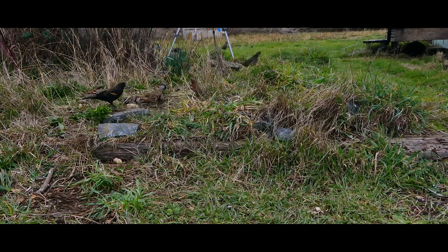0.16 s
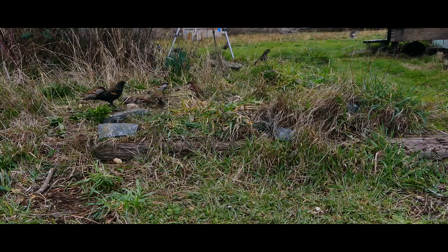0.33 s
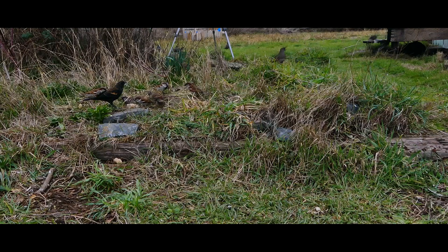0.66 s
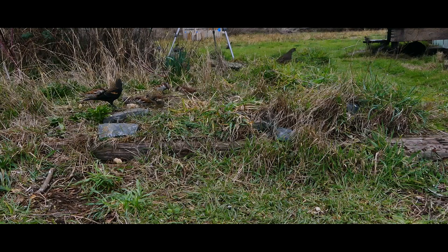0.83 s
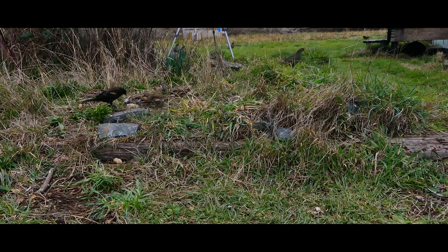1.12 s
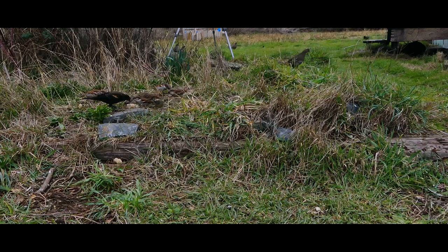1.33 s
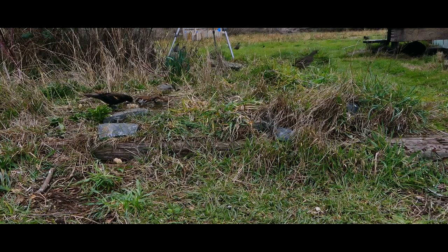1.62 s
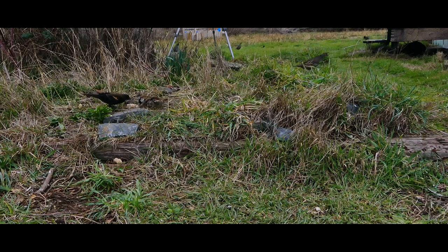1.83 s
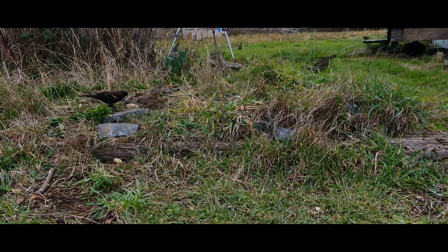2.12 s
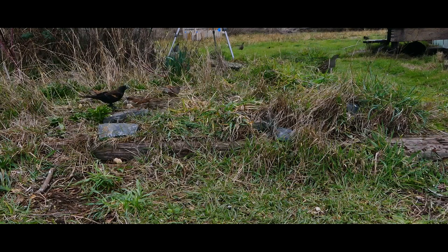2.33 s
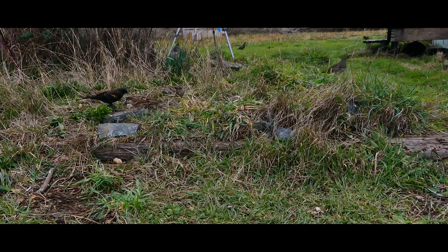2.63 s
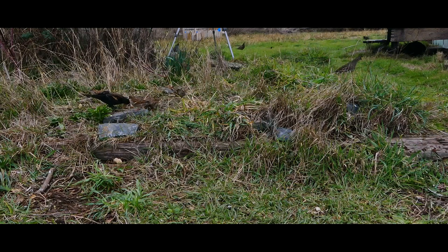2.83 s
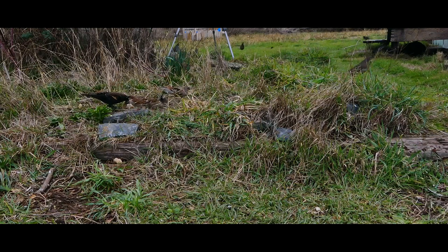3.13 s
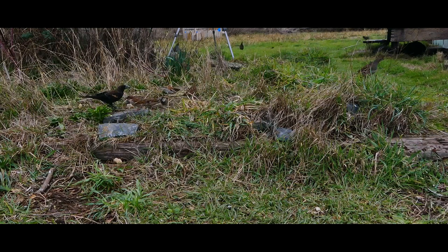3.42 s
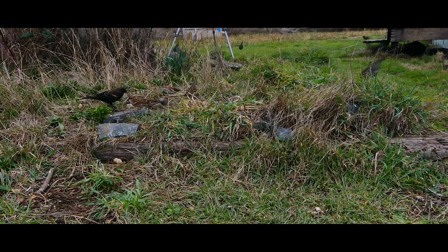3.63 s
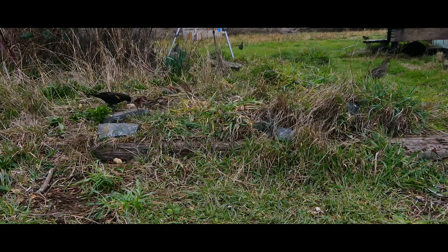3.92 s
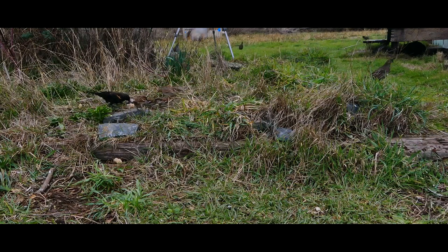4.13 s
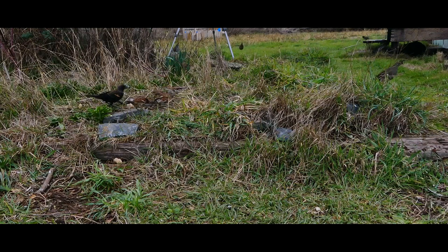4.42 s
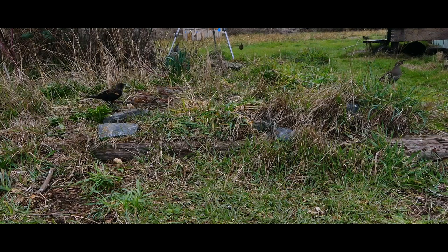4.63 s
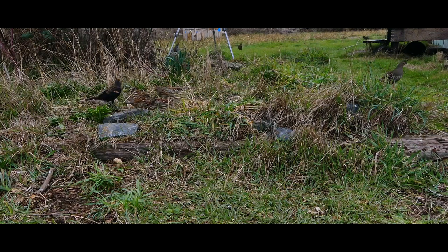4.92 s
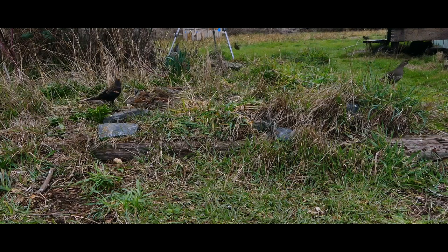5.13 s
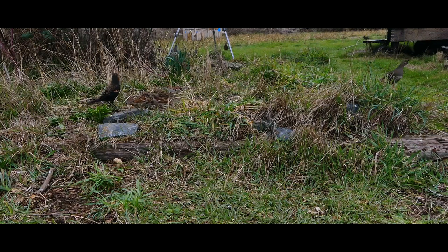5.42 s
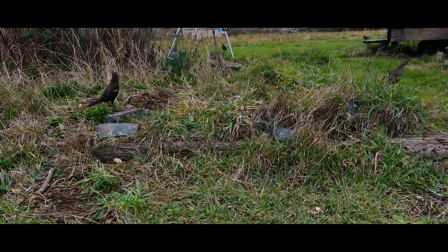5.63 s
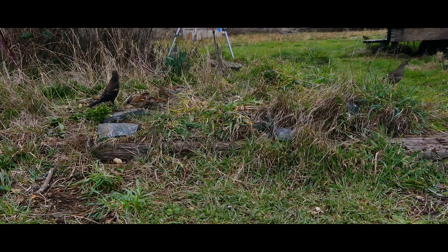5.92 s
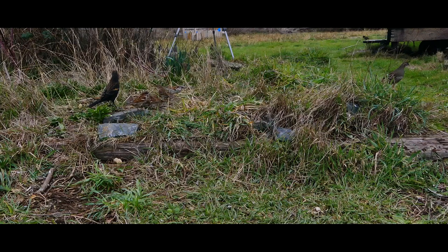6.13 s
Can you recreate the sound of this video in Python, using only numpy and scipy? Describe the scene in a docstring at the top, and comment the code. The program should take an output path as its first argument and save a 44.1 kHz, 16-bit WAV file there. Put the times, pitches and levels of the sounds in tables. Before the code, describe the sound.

A quiet grassy yard outdoors, with a soft low traffic hum far off and a faint treble hiss. From 0 to 1.2 seconds a small bird gives eight sharp, high chips about 0.16 seconds apart, each a tiny upward whip, the first strongest and sweeping highest; soft low clucks alternate with them. Crisp dry stem ticks dot the run, clearest near 0.35. A lone bright chip comes at 2.06, a tick at 2.4, a nearly hidden coo around 2.7 and a thin falling far whistle at 3.1. Wind bumps the microphone lightly, harder near 4.1. A strong chip at 4.2 has two weaker followers. From 5.0 to 6.3 chips crowd together unevenly, with clucks from 5.6, thin rasps and faint pulsed noise, while low wind thumps grow heaviest. Calls leave short, grainy echoes.

```python
"""Small birds in a grassy yard give sharp rising chip calls, singly and in trains: swept tones with an octave overtone.
A ground bird clucks softly between them in short harmonic notes; far birds whistle and coo in gliding tones.
Beaks and feet tick in dry stems as brief noise snaps; a faint treble haze swells, and pulsed noise fills late gaps.
Wind thumps the microphone over a distant low hum of traffic, both noise in low bands.
Fences and walls scatter the calls and ticks into a short grainy tail."""
import sys
import numpy as np
from scipy import signal
from scipy.fft import rfft, irfft, next_fast_len
from scipy.io import wavfile
from scipy.ndimage import uniform_filter1d, map_coordinates

SR = 44100
rng = np.random.default_rng(int(sys.argv[2]) if len(sys.argv) > 2 else 0)


def to_wav(s):
    """Save 16-bit WAV."""
    ch = np.atleast_2d(s).T  # columns
    pcm = np.round(np.clip(ch, -1, 1) * 32767)  # PCM
    wavfile.write(sys.argv[1], SR, pcm.astype(np.int16))


N = 276507

# Chip calls; start, length and pitches are of the loud part, the last three levels are relative:
# start_s, level_db, length_ms, first_hz, last_hz, octave_overtone_db, swing_in_db, run_out_db
CHIP_CALLS = [(0.0385, -20.5, 9.6, 5976, 10500, -25, -34, -17),
              (0.1884, -26.5, 3.7, 5240, 7680, -30.5, -30, -6.5),
              (0.3376, -29, 6, 5150, 7260, -31, -38.5, -7.5),
              (0.4974, -26, 2.1, 5280, 7690, -27.5, -39, -10.5),
              (0.6584, -28, 4.4, 5400, 7580, -30.5, -16, -6.5), (0.8146, -27, 4.5, 5150, 7390, -30, -8, -3),
              (0.9745, -25.5, 1.85, 5210, 7100, -37, -23, -3.5),
              (1.1458, -28, 2.4, 5310, 7360, -35, -19, -13),
              (2.0585, -21.5, 8.6, 5580, 10400, -29.5, -37.5, -25.5),
              (4.2097, -20, 7.2, 5800.0, 10090, -32.5, -39, -24),
              (4.3872, -28, 4.7, 5970, 6940, -25, -30, -42),
              (4.5645, -34, 5.6, 5730, 6430, -33, -28.5, -37),
              (4.9847, -35, 3.1, 6100, 6200, -38, -16.5, -35.5),
              (5.1367, -21.5, 3.6, 5920, 6770, -18, -9.5, -14), (5.2797, -29, 3, 6050, 7000, -25, 4, -30),
              (5.4262, -30.5, 3.6, 6010, 6760, -29, 4, -18), (5.464, -25, 4.6, 6300, 9000, -46, -31, -14),
              (5.536, -49, 2.2, 4900, 7240, -36, -3.5, -14),
              (5.5997, -24.5, 3.1, 5736, 7850, -37, -4.5, -13),
              (5.6412, -21, 1.7, 5340, 8290, -36, -35.5, -12.5),
              (5.7742, -24, 3.6, 5990, 6650, -25, -9.5, -24),
              (5.7872, -24, 4.3, 4950, 8270, -39.5, -19, -8), (5.7992, -33, 5.4, 5540, 7100, -25, -2, -15),
              (5.9333, -30, 4.6, 5280, 7900, -32, -14, -5), (5.9739, -34.5, 2.3, 4920, 6650, -37, -22, -13),
              (6.0737, -28.5, 3.4, 5450, 7310, -33, -8, -2), (6.1154, -37, 3.7, 5410, 6130, -38, -37, -24),
              (6.2662, -31.5, 7.2, 5000.0, 7170, -29, -28, -14)]
# Throat clucks, nominal values: start_s, level_db, pitch_hz, length_ms
THROAT_CLUCKS = [(0.146, -43.5, 697, 15), (0.304, -41, 703, 15.5), (0.461, -41.5, 676, 15),
                 (0.627, -42.5, 668, 15), (0.782, -42.5, 660, 23), (0.936, -46.5, 645, 19.6),
                 (1.11, -47.5, 671, 23.4), (1.321, -50, 726, 11.6), (5.605, -40, 690, 16),
                 (5.752, -41.5, 681.6, 19.6), (5.898, -39, 655, 20), (6.04, -38.5, 644, 20),
                 (6.216, -42.5, 659, 19)]
# Thin rasps with a weak fundamental: start_s, level_db, nominal pitch_hz, length_ms, overtone_centre_hz
THIN_RASPS = [(1.322, -54.5, 856, 11.5, 4850), (5.104, -62, 770, 13.7, 5570),
              (5.243, -49.5, 782, 13.5, 4200), (5.392, -65, 810, 13.7, 5300), (5.426, -51, 710, 7.2, 3460),
              (5.57, -65, 752, 14, 4030), (5.88, -64.5, 755, 20, 3600), (5.95, -61.5, 810, 15.2, 3600)]
# Far whistles, nominal values: start_s, level_db, length_ms, first_hz, middle_hz, last_hz
FAR_WHISTLES = [(1.245, -68, 27, 4670, 4250, 4000), (1.287, -68, 23.6, 3260, 3050, 3000),
                (2.958, -74, 48, 2437, 5380, 4560), (2.962, -78, 48, 5400, 7100, 5750),
                (3.075, -62.5, 29, 6100, 6270, 6070), (3.075, -60.5, 22, 5880, 5700, 5670),
                (3.121, -51, 52, 5030, 3720, 3470), (6.101, -54, 14.4, 1986, 4170, 5600),
                (6.253, -49, 11.7, 2240, 4600, 5970)]
# Faint low cooing far off, nominal values: start_s, level_db, length_ms, pitch_hz
FAR_COOS = [(2.66, -65, 280, 496), (4.72, -61.5, 220, 481)]
# Ticks in dry stems: start_s, peak_db, centre_hz, spread_octaves
STEM_TICKS = [(0.015, -36.5, 9350, 0.7), (0.3477, -27, 10100, 0.66), (0.4364, -49, 9900, 0.52),
              (0.4768, -42, 9500, 0.7), (0.535, -44, 10100, 0.28), (0.5896, -52, 14100, 0.4),
              (0.635, -45, 9500, 0.69), (1.1296, -43.5, 9200, 0.67), (1.279, -55, 10000, 0.18),
              (1.308, -52, 10000, 0.21), (1.457, -56.5, 12600, 0.34), (1.7444, -49, 14000, 0.31),
              (2.0354, -42, 9700, 0.54), (2.4396, -33.5, 11660, 0.61), (2.4741, -58.5, 10920, 0.49),
              (2.6708, -63, 10960, 0.37), (2.8999, -43.5, 12000, 0.45), (2.908, -35, 14000, 0.55),
              (3.319, -53.5, 14000, 0.4), (3.906, -62, 10870, 0.4), (4.022, -53, 12200, 0.4),
              (4.0363, -60, 9400, 0.32), (5.2006, -64, 10300, 0.45)]
# Level of the faint pulsed noise between the late calls: time_s, level_db
PULSED_LEVEL = [(5.05, -100), (5.2, -72), (5.45, -69), (5.7, -80), (5.9, -70), (6.0, -74), (6.15, -78),
                (6.27, -72)]
# Relative spectral density of the pulsed noise: frequency_hz, density_db_per_hz
PULSED_SPECTRUM = [(1200, -120), (1800, -12), (2800, -2), (3700, 0), (5000, -4), (8000, -14), (14000, -30)]
# Swells of the treble haze, broad among the calls, brief elsewhere:
# peak_s, rise_over_rest_db, dying_time_s (to 1/e of the dB rise)
HAZE_SWELLS = [(0, 5, .9), (.36, 9, .07), (.56, 5, .07), (2.459, 7, .06), (2.66, 4, .06), (3.9, 3.5, .05),
               (4.04, 13, .08), (5.15, 3.5, .8)]
# Relative spectral density of the treble haze: frequency_hz, density_db_per_hz
HAZE_SPECTRUM = [(1760, -35.5), (3000, 3.5), (3180, -17), (3710, -12.5), (4690, -11), (5040, -6),
                 (5720, -1), (7710, -9), (9470, -1.5), (12400, -3), (15100, -4.5), (15800, -15.5),
                 (16400, -24.5)]
# Strength of the wind on the microphone: time_s, strength_db
WIND_STRENGTH = [(0, -70), (1.5, -64), (1.9, -55), (2.4, -51), (2.8, -62), (3.6, -55), (4.05, -48),
                 (4.3, -52), (4.7, -57), (5.1, -50), (5.45, -46), (5.68, -48), (5.8, -44), (5.93, -49),
                 (6.1, -42), (6.27, -41.5)]
# Relative spectral density of wind thumps, also used for the drone: frequency_hz, density_db_per_hz
THUMP_SPECTRUM = [(29, -67), (50, -34.5), (75, -8), (107, 2.5), (124, 1), (145, -5.5), (198, -7.5),
                  (350, -21.5), (460, -43), (770, -120)]
# Relative spectral density of the deep wind buffet: frequency_hz, density_db_per_hz
BUFFET_SPECTRUM = [(15, -29.5), (30, -17), (50, -6.5), (70, 0), (95, -16.5), (130, -41), (200, -120)]
# The hardest wind lumps: centre_s, peak_db, length_ms, pitch_hz
WIND_LUMPS = [(1.718, -45.5, 39, 113), (1.823, -39, 39, 92), (2.165, -38, 15, 113), (2.435, -44.5, 34, 100),
              (2.651, -46.5, 34, 118), (3.382, -45, 21, 108), (3.906, -41.5, 15, 97),
              (3.969, -40.5, 47, 124), (4.087, -34, 22, 108), (4.212, -41.5, 35, 124),
              (4.398, -47.5, 21, 108), (5.218, -34, 24, 102), (5.298, -34.5, 33, 97),
              (5.385, -32.5, 19, 118), (5.478, -39, 12, 102), (5.606, -34.5, 23, 170),
              (5.782, -33, 32, 108), (5.85, -35.5, 14, 113), (6.02, -37, 48, 105), (6.091, -30.5, 23, 129),
              (6.169, -30, 24, 102), (6.215, -32.5, 17, 110)]
# Level of the far traffic hum: time_s, level_db
TRAFFIC_LEVEL = [(0, -53.5), (1.4, -54.5), (2.2, -56), (3.0, -56.5), (4.1, -55), (4.5, -56.5), (5.3, -55),
                 (6.27, -52.5)]
# Relative spectral density of the traffic hum: frequency_hz, density_db_per_hz
HUM_SPECTRUM = [(100, -31), (170, -1), (203, -2.5), (371, -6.5), (414, -7.5), (462, -5.5), (617, -9),
                (768, -11), (1400, -13.5), (2150, -26), (2860, -44), (4500, -43), (5850, -76.5),
                (9900, -120)]
# Level of the low drone of the traffic: time_s, level_db
DRONE_LEVEL = [(0, -54), (1.6, -53.5), (3, -60), (6.27, -62)]
# Reverberation of the yard, time to fall 60 dB: frequency_hz, t60_s
YARD_DECAY = [(600, 0.25), (3000, 0.29), (4500, 0.18), (6500, 0.16), (10000, 0.15), (15000, 0.14)]
# Frequency response of the microphone: frequency_hz, gain_db
MIC_RESPONSE = [(2500, -2), (4300, -5.5), (6300, 3), (8000, -2), (10000, 2.5), (12500, -3.5), (15500, 0.5),
                (16400, -11.5)]

TOP_HZ = 16400  # band limit
# Overtone slope per octave at the middling level; fuller clucks are rounder by DULLS dB per dB
CLUCK_SLOPE_DB, CLUCK_MID_DB, CLUCK_DULLS = -7.5, -42, .7
RASP_OCTAVES = .65  # spread of the overtones heard
PULSES_PER_S = 22  # mean rate of the pulsed noise
HAZE_DB, SWELL_RISE_S = -85.5, 0.033  # haze at rest; time constant of a swell coming up
# Deep buffet level at a middling wind; it swings wider than the wind
BUFFET_DB, BUFFET_GROWS, BUFFET_FROM_DB = -64.5, 1.1, -54


def amp(db):
    """A level in decibels is twenty times the logarithm of the gain."""
    return 10 ** (np.asarray(db) / 20)


def unit(x):
    """Division by the root mean square gives a signal of rms 1."""
    return x / np.sqrt(np.mean(x ** 2) + 1e-20)


def along(points, hz):
    """A spectrum given as (Hz, value) points is interpolated on a logarithmic frequency axis."""
    f, v = np.transpose(points)
    return np.interp(np.log(hz + 1), np.log(f + 1), v)


def curves(rows):
    """Linear interpolation in time gives one value per sample for each column after the time."""
    s, *cols = np.transpose(rows)
    return [np.interp(np.arange(N) / SR, s, c) for c in cols]


def span(ms):
    """Progress through a note runs uniformly from 0 to 1."""
    return np.linspace(0, 1, max(round(ms * SR / 1000), 8))


def filtered(x, response):
    """A linear filter multiplies the spectrum by its frequency response."""
    m = next_fast_len(len(x) + 8192)
    hz = np.fft.rfftfreq(m, 1 / SR)
    return irfft(rfft(x, m) * response(hz), m)[:len(x)]


def wobble(rate):
    """A slow random fluctuation is a smooth curve through rate random knots a second."""
    knots = rng.standard_normal(int(N * rate / SR) + 4)
    return map_coordinates(knots, [np.arange(N) * rate / SR])


def rush(spectrum, patchy_db):
    """Coloured noise of rms 1 is shaped by a spectrum, its gain varying in patches of time and frequency."""
    z = signal.stft(rng.standard_normal(N + 512), nperseg=512)[2]
    field = uniform_filter1d(rng.standard_normal(z.shape), size=6, axis=0)
    field = uniform_filter1d(field, size=10, axis=1)
    noise = signal.istft(z * amp(patchy_db * unit(field)), nperseg=512)[1][:N]
    return unit(filtered(noise, lambda hz: amp(along(spectrum, hz))))


def add(out, s, sound, wet_db, lumpy_db=3.5):
    """Scattering adds clumped echoes to a sound, each frequency decaying exponentially at its own rate."""
    hz, t, z = signal.stft(rng.standard_normal(SR // 2), SR, nperseg=128)
    clumps = lumpy_db * rng.standard_normal(len(t))
    near_fences = amp(-60 * t / along(YARD_DECAY, hz)[:, None])
    far_walls = amp(-31 - 60 * t / 0.53)
    tail = signal.istft(z * (near_fences + far_walls) * amp(clumps), SR, nperseg=128)[1]
    delayed = np.pad(tail / np.linalg.norm(tail), (round(0.0037 * SR), 0))
    heard = amp(wet_db) * signal.fftconvolve(sound, delayed)
    heard[:len(sound)] += sound
    spot = out[round(s * SR):][:len(heard)]
    spot += heard[:len(spot)]


def chips():
    """Frequency modulation snaps a whistle upward: a swing-in rich in overtone, from faint to as strong
    as the sweep, then the loud sweep and a weaker run-out above."""
    out, lead_ms, trail_ms = np.zeros(N), 3., 2.2
    for s, db, ms, first, last, over_db, lead_db, trail_db in CHIP_CALLS:
        u, v, w = span(ms), span(lead_ms), span(trail_ms)
        swing_in = first * (.58 + .42 * v ** .8)
        sweep = first + (last - first) * u ** 0.71
        pitch = np.concatenate([swing_in, sweep, last + 1800 * w])

        width = (last - first) / 4500
        skew = .95 - .45 * width  # wide sweeps are loudest early, and they throb
        throb = 1 + .45 * width ** 2 * np.sin(2 * np.pi * (550 * u * ms / 1000 + rng.random()))
        edges = amp(lead_db) * (1 - u) + amp(trail_db) * u
        loud = edges + throb * np.sin(np.pi * u ** skew)
        level = np.concatenate([amp(lead_db) * v ** 1.04, loud, amp(trail_db) * (1 - w)])
        level = signal.fftconvolve(level, np.hanning(40) / 20, "same")  # rounds the joins

        below_first = np.clip(1 - pitch / first, 0, 1)
        overtone = amp(over_db + 26 * below_first / 0.39)
        phase = 2 * np.pi * np.cumsum(pitch) / SR
        call = amp(db) * level * (np.sin(phase) + overtone * np.sin(2 * phase))
        # the bounce off the ground splits the note into lobes
        lag = round((1.5 + .9 * rng.random()) * SR / 1000)
        call = np.pad(call, (0, lag)) + amp(-6) * np.pad(call, (lag, 0))
        add(out, s - lead_ms / 1000, call, wet_db=-6)
    return out


def stack(hz, ms, gains, rough_db, loose):
    """A rising harmonic series: high overtones sound only near its peak, each flickers, loose frees phases."""
    u, k = span(ms), np.arange(1, 13)[:, None]  # k: harmonic number
    phase = 2 * np.pi * np.cumsum(hz * (.84 + 0.205 * u ** .5)) / SR
    flicker = uniform_filter1d(rng.standard_normal((len(k), len(u))), size=60, axis=1)
    flicker = uniform_filter1d(flicker, size=40, axis=1)
    slip = loose * 2 * np.pi * rng.random(k.shape)
    swell = np.abs(np.sin(np.pi * u ** 1.3)) ** (.7 + .22 * k)
    level = gains(k) * swell * amp(rough_db * unit(flicker))
    return np.sum(level * np.sin(k * phase + slip), axis=0)


def clucks():
    """Soft throat clucks are harmonic series whose overtones fall more gently in quiet notes... and """ \
        """vary with level."""
    out = np.zeros(N)
    for s, db, hz, ms in THROAT_CLUCKS:
        slope_db = CLUCK_SLOPE_DB - CLUCK_DULLS * max(db - CLUCK_MID_DB, -4)
        gains = lambda k: amp(slope_db * np.log2(k) - 2.1 * k)
        note = stack(hz, ms * 1.25, gains, rough_db=3.5, loose=.2)
        add(out, s - .002, amp(db + 3) * note, wet_db=-5.5, lumpy_db=2.2)
    return out


def rasps():
    """Thin rasps are harmonic series band-limited to the upper overtones, in random phase."""
    out = np.zeros(N)
    for s, db, hz, ms, centre in THIN_RASPS:
        band = lambda k: np.exp(-(np.log2(k * hz / centre) / RASP_OCTAVES) ** 2)
        note = stack(hz, ms, band, rough_db=7, loose=1)
        add(out, s, amp(db) * note, wet_db=-5)
    return out


def whistles():
    """Far whistles are single tones on a parabolic glide, slightly unsteady in pitch and level."""
    out, knots = np.zeros(N), np.linspace(0, 1, num=16)
    for s, db, ms, *hz in FAR_WHISTLES:
        u = span(ms)
        pitch = np.polyval(np.polyfit([0, .5, 1], hz, deg=2), u)
        pitch *= 1 + 0.0097 * np.interp(u, knots, rng.standard_normal(16))
        waver = amp(4 * np.interp(u, knots, rng.standard_normal(16)))
        level = waver * np.sin(np.pi * u) ** .6 * (pitch / pitch.max()) ** 1.9  # louder where higher
        note = amp(db + 2.0) * level * np.sin(2 * np.pi * np.cumsum(pitch) / SR)
        add(out, s, note, wet_db=-10)
    return out


def coos():
    """A soft coo is a single tone that swells and sinks under random frequency and amplitude modulation."""
    out = np.zeros(N)
    for s, db, ms, hz in FAR_COOS:
        u = span(ms)
        knots = rng.standard_normal((2, 12))
        waver_db, drift = [np.interp(u, np.linspace(0, 1, num=12), k) for k in knots]
        phase = 2 * np.pi * np.cumsum(hz * (1 + .035 * drift)) / SR
        level = amp(db + 2.7 * waver_db) * np.sin(np.pi * u) ** 0.54
        add(out, s, level * np.sin(phase), wet_db=-1)
    return out


def ticks():
    """A tick is an impulsive, exponentially decaying noise burst, band-limited to its own colour."""
    out, t = np.zeros(N), np.arange(-64, 192) / SR
    for s, db, hz, spread in STEM_TICKS:
        decay = amp(-60 * t / .004) * (t >= 0)  # 60 dB in 4 ms
        snap = rng.standard_normal(len(t)) * decay
        snap = filtered(snap, lambda f: np.exp(-(np.log2((f + 1) / hz) / spread) ** 2))
        add(out, s + .001 + t[0], amp(db) * snap / np.abs(snap).max(), wet_db=-3.0)
    return out


def pulsed_noise():
    """Amplitude modulation pulses faint mid-treble noise unevenly, filling the gaps between late calls."""
    cycles = np.cumsum(PULSES_PER_S * (1 + .15 * wobble(6))) / SR
    pulses = np.abs(np.sin(np.pi * cycles)) ** 1.5
    level_db = curves(PULSED_LEVEL)[0]
    return amp(level_db) * unit(pulses * rush(PULSED_SPECTRUM, patchy_db=3.0))


def treble_haze():
    """Faint high noise with random crackle rises and dies exponentially in decibels at each swell."""
    t = np.arange(N) / SR
    swell_db = 0
    for s, db, dies in HAZE_SWELLS:
        swell_db = swell_db + db * np.exp(np.minimum((t - s) / SWELL_RISE_S, (s - t) / dies))
    burst_db = .8 + .2 * swell_db  # louder haze comes in bursts
    clicks = (rng.random(N) < 40 / SR) * 30.  # about 40 a second
    crackle = 1 + 1.5 * uniform_filter1d(clicks, size=30)
    level = amp(HAZE_DB + swell_db + burst_db * wobble(22))
    return level * crackle * rush(HAZE_SPECTRUM, patchy_db=0.3)


def wind():
    """Wind on the microphone makes low-frequency noise: gusty thumps and a deeper, wider-swinging buffet."""
    wind_db = curves(WIND_STRENGTH)[0]
    gusts = amp(1.1 * wobble(14) + 0.93 * wobble(4))
    thump = amp(wind_db) * unit(gusts * rush(THUMP_SPECTRUM, patchy_db=2.0))
    buffet_db = BUFFET_DB + BUFFET_GROWS * (wind_db - BUFFET_FROM_DB)
    buffet = amp(buffet_db) * unit(amp(2.5 * wobble(6)) * rush(BUFFET_SPECTRUM, patchy_db=1.0))
    return thump + buffet


def lumps():
    """A hard puff of wind rocks the microphone: a low tone under a bell envelope, a weaker knock just below its
    octave."""
    t, out = np.arange(N) / SR, np.zeros(N)
    for s, db, ms, hz in WIND_LUMPS:
        rock_phase, knock_phase = 2 * np.pi * rng.random(2)
        bell = np.exp(-(1600 * (t - s) / ms) ** 2)
        rock = np.sin(2 * np.pi * hz * t + rock_phase)
        knock = amp(-8) * bell * np.sin(2 * np.pi * 1.9 * hz * t + knock_phase)
        out += amp(db) * bell * (rock + knock)
    return out


def traffic():
    """Distant traffic is steady low-passed noise: a hum and a lower drone, each slowly fluctuating."""
    hum_db = curves(TRAFFIC_LEVEL)[0]
    hum = amp(hum_db + 0.93 * wobble(5.1)) * rush(HUM_SPECTRUM, patchy_db=2.2)
    drone_db = curves(DRONE_LEVEL)[0]
    drone = amp(drone_db) * unit(amp(1.3 * wobble(12)) * rush(THUMP_SPECTRUM, patchy_db=2.5))
    return hum + drone


def scene():
    """Sound pressures superpose: all sources add at one microphone."""
    birds = chips() + clucks() + rasps() + whistles() + coos()
    faint_treble = ticks() + pulsed_noise() + treble_haze()
    background = wind() + lumps() + traffic()
    return (birds + faint_treble + background)[None]


def record(dry):
    """The small microphone's frequency response colours the treble; nothing is kept above the band limit."""
    return filtered(dry[0], lambda hz: (hz < TOP_HZ) * amp(along(MIC_RESPONSE, hz)))[None]


dry = scene()
out = record(dry)
to_wav(out)
```